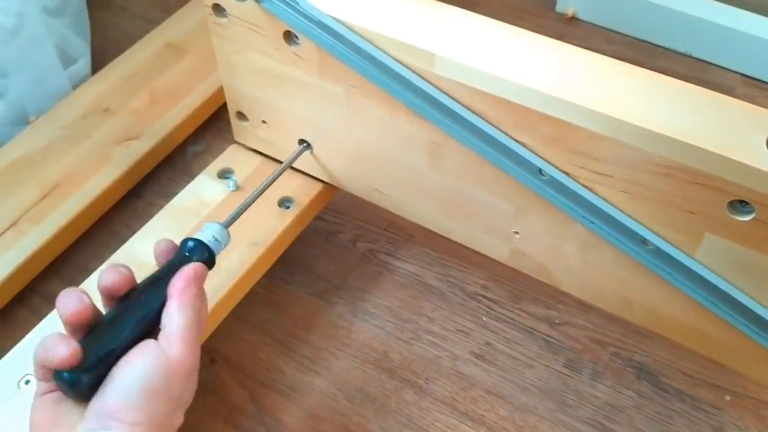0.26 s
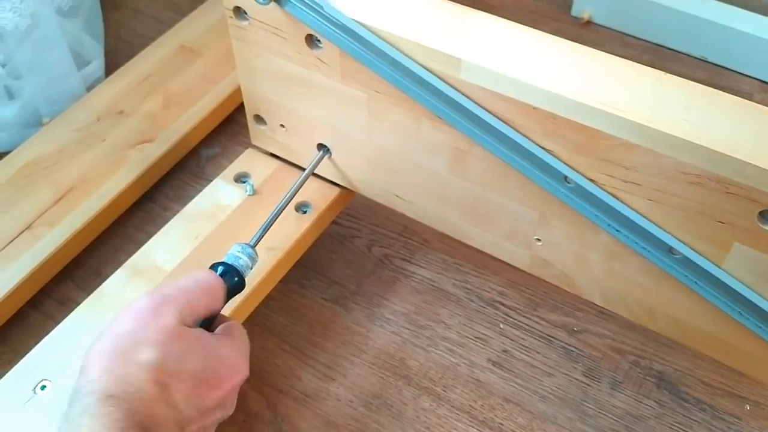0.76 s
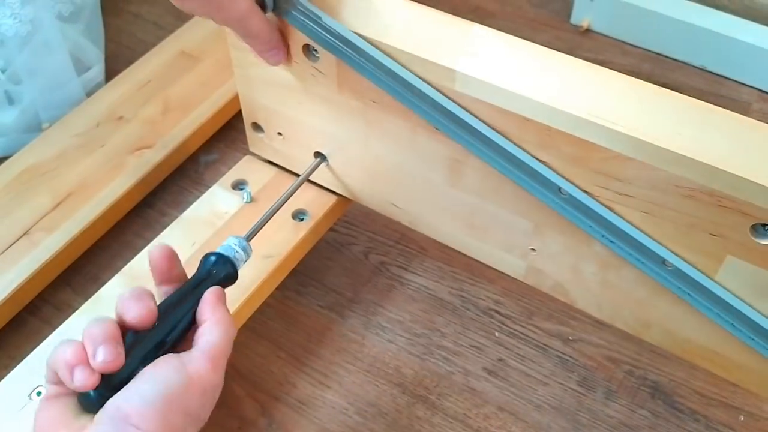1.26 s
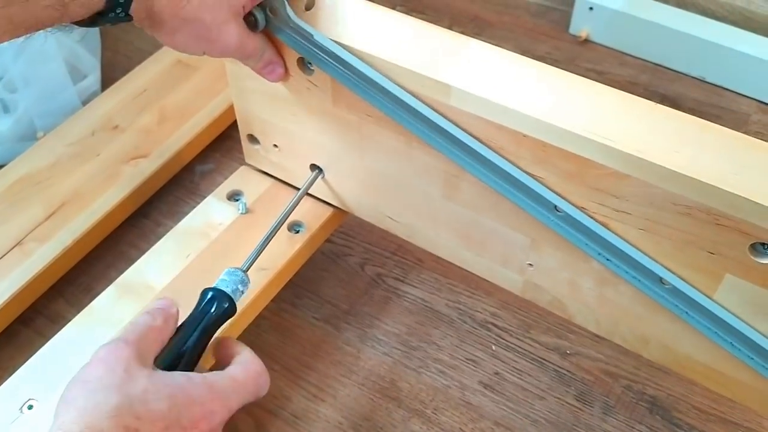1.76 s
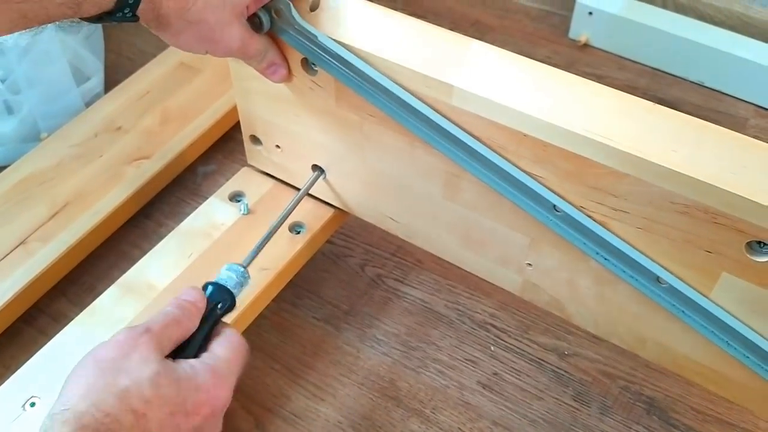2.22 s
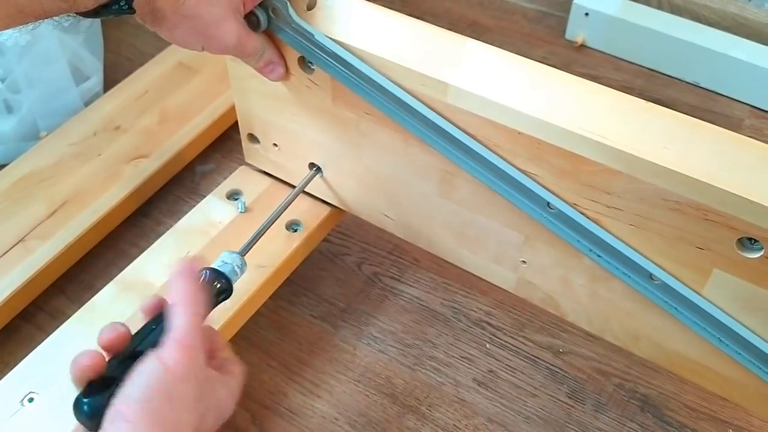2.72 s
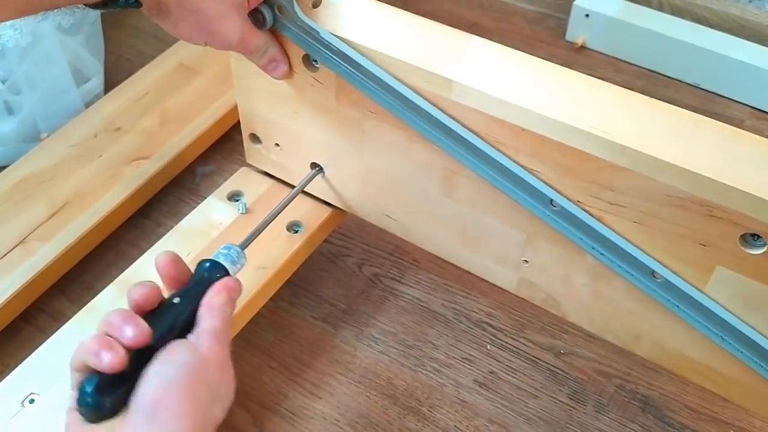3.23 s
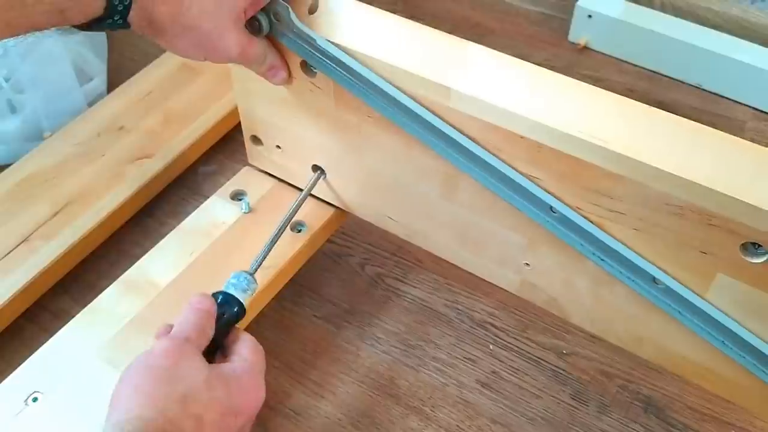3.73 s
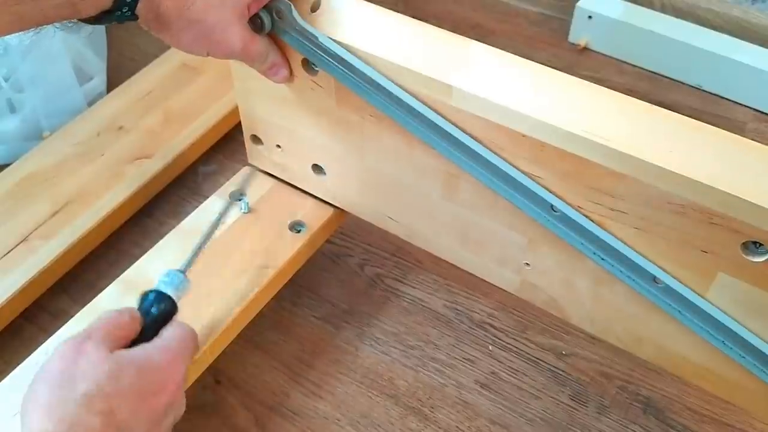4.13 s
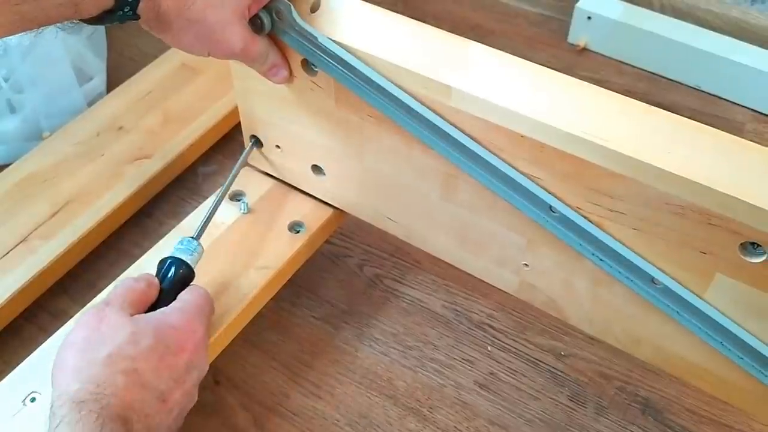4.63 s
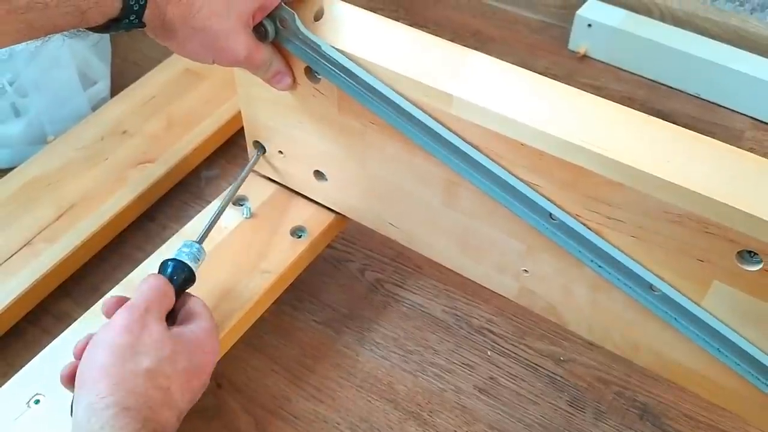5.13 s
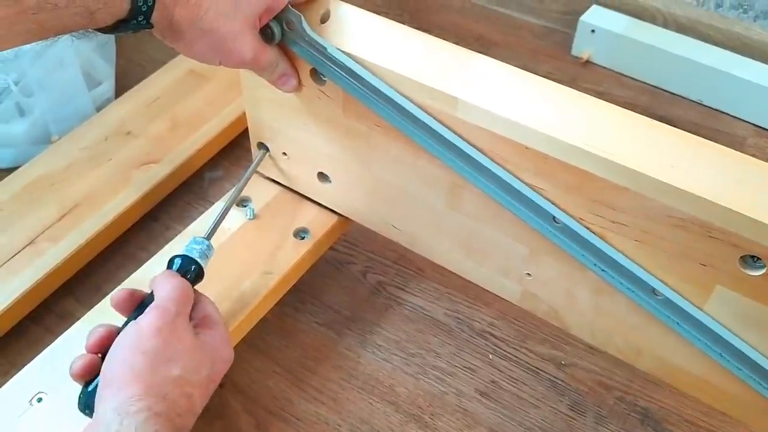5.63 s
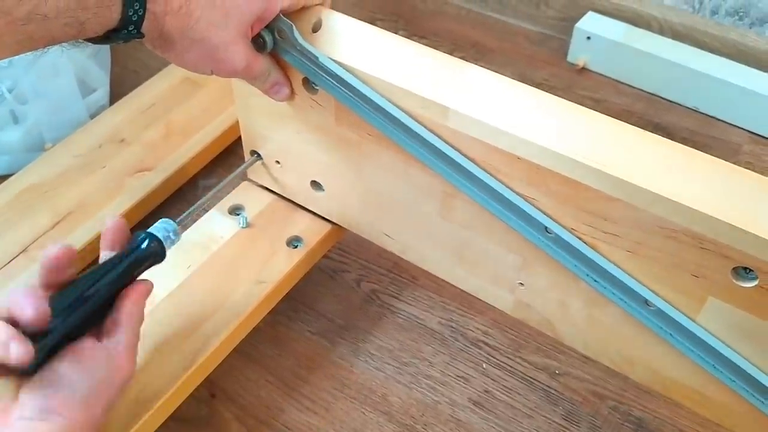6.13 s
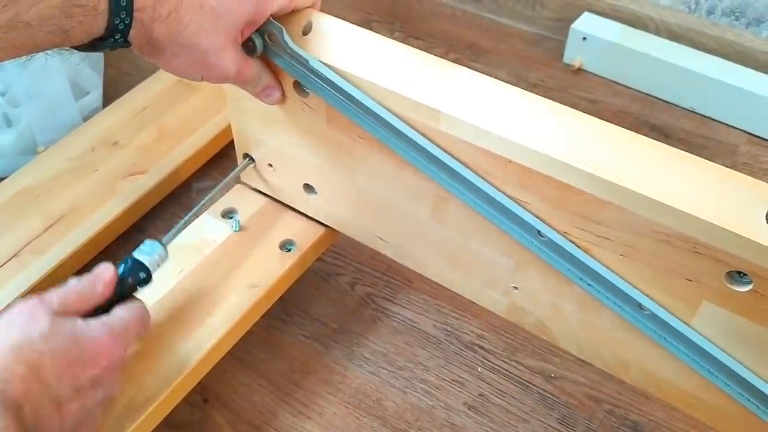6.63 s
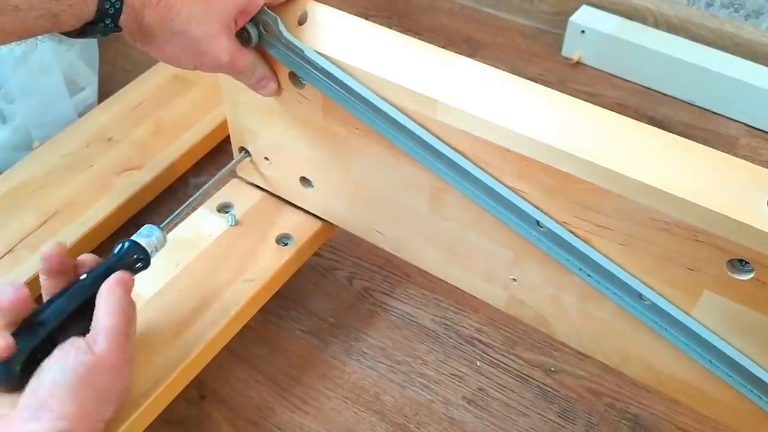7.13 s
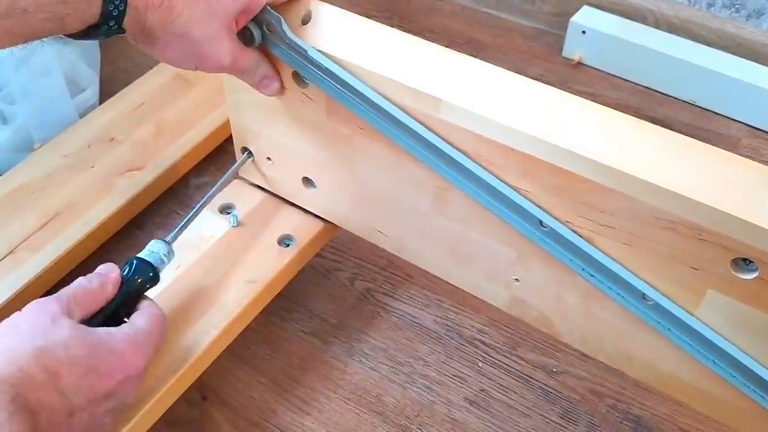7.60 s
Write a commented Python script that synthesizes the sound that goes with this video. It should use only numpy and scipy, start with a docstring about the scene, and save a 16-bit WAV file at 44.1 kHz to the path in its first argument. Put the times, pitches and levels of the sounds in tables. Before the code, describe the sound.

Close indoor assembly work: uneven short knocks on wooden boards with thin steel rings and crisp ticks, mixed with dry hand slides over handle and wood. The start is woody, the middle light and fiddly with a faint treble squeak. Near five seconds come the loudest, most metallic clacks and rattles; later taps grow sparse and dull, with a low frame bump near the end. Soft room air throughout.

```python
"""Screwdriver on a bed frame

A small room, a two-port microphone close to a wooden bed frame whose bolts are turned by screwdriver.
Each slip or knock is a burst of jagged force that rings boards, rail and shaft and leaves a bright tick.
Hands slide over handle and wood as grainy noise; dying sines make steel clinks and floor bumps.
Thin wavering sines squeak in the treble; a low noise rumble wavers beneath, in steady still air.
"""
import sys
import numpy as np
from scipy import signal
from scipy.fft import rfft, irfft, next_fast_len
from scipy.io import wavfile
from scipy.ndimage import uniform_filter1d

SR = 44100
rng = np.random.default_rng(int(sys.argv[2]) if len(sys.argv) > 2 else 0)


def put_to_file(sound):
    """Save the sound as 16-bit audio at rate SR, in the file named by the first command-line argument."""
    columns = np.atleast_2d(sound).T  # one column per channel
    safe = np.clip(columns, -1, 1)
    whole_steps = np.round(safe * 32767)
    wavfile.write(sys.argv[1], SR, whole_steps.astype(np.int16))


N = 346626

# Still air of the room: pitch_hz, relative density_db (per Hz)
AIR_SPECTRUM = [(60, -33.5), (100, -12.5), (200, 11.5), (500, 1.5), (700, -3.5), (2000, -7.5), (5000, -18),
                (9000, -8), (13000, -27.5), (16500, -42)]
# Low rumble: pitch_hz, relative density_db (per Hz)
RUMBLE_SPECTRUM = [(10, -16), (28, -10), (40, -11), (52, 0), (64, -16), (100, -19), (140, -26), (250, -50)]
# Wavering of the rumble: time_s, level_db
RUMBLE_LEVELS = [(0.0, -44), (0.46, -59.5), (0.59, -43), (1.14, -47.5), (1.42, -48), (1.52, -39.5),
                 (1.64, -48), (2.06, -52.5), (3.4, -48), (3.96, -39), (4.08, -52), (4.7, -54),
                 (5.28, -44.5), (5.82, -40.5), (6.6, -61.5), (6.92, -37), (7.15, -49), (7.53, -47),
                 (7.86, -40.5)]
# Knocks of the tip: peak_force_s, boards_db, shaft_db, tick_db, build_up_ms
KNOCK_EVENTS = [(0.005, -17, -22.5, -24, 3.15), (0.143, -25.5, -47.5, -27.5, 4.3),
                (0.155, -14.5, -21.5, -27.5, 3.2), (0.495, -34, -32.5, -64, 0.71),
                (0.528, -21, -32, -44, 2.1), (1.001, -23.5, -48, -50, 1.8), (1.115, -22, -45, -38, 1.2),
                (1.29, -38, -60, -56, 1.2), (1.5, -40, -63, -54, 1.6), (1.628, -29.5, -39, -51, 9.9),
                (1.722, -35.5, -46, -67, 4.2), (1.854, -25.5, -34.5, -33.5, 2.9),
                (1.884, -26, -39, -44, 12), (2.265, -29.5, -51, -45, 3.5), (2.389, -29, -34.5, -54, 2.5),
                (2.569, -36.5, -48, -45, 5.8), (2.694, -48.5, -57, -55, 2), (2.732, -30, -56, -46, 7),
                (2.865, -26, -66, -64, 1.4), (2.88, -32, -40, -44, 1.3), (3.036, -24.5, -42, -41, 4.6),
                (3.066, -27, -51, -33.5, 8), (3.198, -22.5, -39.5, -27, 0.91), (3.313, -27, -47, -38, 3.7),
                (3.331, -15, -29.5, -31, 4.4), (3.522, -33, -34.5, -49.5, 1.3),
                (3.693, -36.5, -31, -33, 2.7), (3.79, -22, -38.5, -36.5, 2.2),
                (3.869, -33, -44, -46.5, 0.88), (3.942, -35, -44.5, -54, 1.1),
                (4.036, -39.5, -53, -52, 4.6), (4.13, -49.5, -42, -35, 1.4),
                (4.162, -49, -31.5, -26.5, 2.7), (4.189, -39, -35.5, -40, 1.7), (4.215, -68, -58, -43, 1.5),
                (4.291, -84, -70, -46, 1), (4.511, -37.5, -41, -42, 2.2), (4.729, -12, -10, -30.5, 0.19),
                (4.897, -30.5, -28.5, -35, 3.1), (4.909, -26, -32, -35, 9.7),
                (4.925, -22.5, -5.5, -26, 0.52), (4.952, -32.5, -20.5, -21.5, 9.1),
                (4.978, -75, -55, -41, 1.2), (5.144, -23.5, -20, -19.5, 2.7), (5.152, -27, -16.5, -10, 1.2),
                (5.166, -27, -9, -7.5, 5.4), (5.376, -19.5, -27.5, -41, 7.2), (5.387, -35.5, -33, -45, 4.2),
                (5.427, -11, -34, -45, 14), (5.441, -30, -6, -13.5, 8.3), (5.577, -20.5, -19, -22.5, 6.1),
                (5.596, -26, -11.5, -2, 2.8), (5.754, -19, -33, -36.5, 4.9),
                (5.851, -21.5, -31.5, -35.5, 1.5), (5.948, -17, -23.5, -31, 2.3),
                (6.006, -36.5, -47, -42, 0.66), (6.067, -37, -59, -56, 1.7), (6.253, -43, -36, -37.5, 4.7),
                (6.317, -43.5, -76, -57, 2.4), (6.44, -47.5, -63, -55, 3), (6.504, -37.5, -43, -73, 3.9),
                (6.836, -31.5, -61, -48, 1.5), (7.02, -25.5, -45, -60, 5.1),
                (7.227, -26, -37.5, -49.5, 1.5), (7.414, -43, -43, -35, 3.4), (7.424, -37, -19.5, -25, 2.3),
                (7.444, -76, -23, -45, 6), (7.532, -15.5, -14.5, -19, 3.6), (7.697, -22.5, -21, -33, 0.8),
                (7.765, -37, -60, -41, .7), (7.845, -31.5, -33.5, -77, 2.9)]
# Work stages, as grip and tightness retune the boards and change what reaches the rail:
# start_s, rail_change_db, boards_pitch_factor (no unit)
WORK_STAGES = [(0, -3.5, 1.036), (1.8, -1, 1), (3.1, -3.5, 1.003), (4.6, 3.5, 1.063), (5.7, 1, 1.001),
               (7.3, -2.5, 0.92)]
# Modes of the boards before the stage's pitch factor: pitch_hz, relative level_db, t60_s
BOARD_MODES = [(183, -16, 0.4), (223.5, -12, 0.24), (266, -13, 0.36), (410.6, -3, 0.19), (388.4, -1, 0.11),
               (568.7, 3.5, 0.2), (652, 4.5, 0.025)]
# Modes of the rail: pitch_hz, relative level_db, t60_s
RAIL_MODES = [(740, -8.5, 0.27), (823, 3.5, 0.14), (908.4, -1, 0.12), (1063, 4.5, 0.1), (1120, -6.5, 0.27),
              (1188, -7.5, 0.018)]
# Modes of the screwdriver shaft: pitch_hz, relative level_db, t60_s
SHAFT_MODES = [(1498, -0.5, 0.18), (1548, 11.5, 0.057), (1826, 17.8, 0.038), (1905, 13, 0.065),
               (2022, 26.9, 0.013), (2327, 16, 0.025), (2490, 15, 0.025), (2830, 6, 0.03),
               (3507, 8.9, 0.024)]
# Bright tick of the tip: pitch_hz, relative density_db (per Hz)
TICK_SPECTRUM = [(1500, -18.5), (2500, 6.5), (3200, 3), (3900, 5.5), (5500, -0.5), (7600, 0.5), (9200, 3),
                 (10200, -1), (11500, -8.5), (14000, -33), (16500, -58)]
# Blunt part of a blow on wood: pitch_hz, relative density_db (per Hz)
THUD_SPECTRUM = [(100, -28.5), (200, -1), (310, -8), (400, 0), (480, -14.5), (620, 1.5), (1000, -5.5),
                 (2000, -17), (3500, -35.5)]
# Uneven radiation towards the two ports: boards_db, rail_db, shaft_db, tick_db, thud_db
PORT_SPREAD = (2.24, 4.5, 3.5, 0.5, 2.5)
# Likeness of left and right in noises and echoes: pitch_hz, likeness (0 to 1)
PORT_LIKENESS = [(30, .85), (250, .95), (700, .75), (2000, .3), (8000, .3)]
# Balance of the ports: pitch_hz, left_above_right_db
PORT_BALANCE = [(200, -1.2), (1400, -.5), (2800, -3.4), (5600, -2), (10000, 1.7), (14000, 3.5)]
# Dying away of the room: pitch_hz, t60_s
ROOM_DECAY = [(150, 0.64), (400, 0.078), (1040, 0.3), (2760, 0.26), (7280, 0.24), (14000, 0.052)]
# Strength of the room: pitch_hz, tail_against_direct_db
ROOM_LEVEL = [(200, -8.5), (1000, -8), (3000, -9), (9000, -9)]
# Skin waking the resonances of wood and handle: pitch_hz, relative density_db (per Hz)
HISS_SPECTRUM = [(300, -16), (600, 2.5), (850, -4.5), (1100, -1.5), (1550, -7.5), (2150, -2), (2600, -10.5),
                 (3200, -11), (5020, -12.5), (10500, -6), (14500, -44.5), (16500, -60.5)]
# Strokes of skin over handle and wood: fastest_moment_s, level_db, length_s,
# brightness_db (added to the treble, taken from the hiss below)
HAND_STROKES = [(0.347, -45.5, 0.19, 3), (0.63, -51, 0.47, -3.5), (0.911, -40, 0.099, 1.5),
                (1.025, -54.5, 0.52, -7.5), (1.14, -51, 0.59, 4), (1.343, -50, 0.16, -8.5),
                (1.568, -49.5, 0.078, -5), (1.417, -33, 0.1, 4), (1.634, -43.5, 0.23, -1.5),
                (2.217, -52.5, 1, -1), (2.394, -53.5, 0.05, -14), (2.716, -46.5, 0.02, 0),
                (2.9, -50.5, 0.57, 1.5), (3.314, -47.5, 0.22, -2), (3.81, -64.5, 0.15, -18),
                (4.301, -58.5, 0.039, 18), (4.6, -61, 1, -11.5), (5.743, -52, 1, -2),
                (6.678, -50, 0.26, -9), (7.26, -58, 0.071, -13), (7.743, -51, 0.66, -7.3)]
# Tiny clinks of steel on steel: start_s, relative level_db, pitch_hz, t60_s
CLINK_EVENTS = [(0.9415, -18.5, 8970, 0.0069), (0.9662, -32, 9140, 0.024), (0.9774, -37, 9100, 0.026),
                (0.9858, -31.5, 9000, 0.026), (1.0695, -41, 8960, 0.019), (2.982, -46, 2070, 0.04),
                (3.061, -33.5, 2000, 0.069), (3.197, -27, 2017, 0.03), (3.322, -29, 2130, 0.037)]
# Bumps of the frame on the floor: start_s, level_db (each tone), reference pitch_hz, t60_s
BUMP_EVENTS = [(1.43, -39, 175, 0.18), (2.417, -41.5, 167, 0.16), (2.879, -41.5, 162.7, 0.62),
               (7.534, -28.5, 172, 0.2), (7.699, -42.5, 208, 0.13)]
# Thin treble squeaks, one strand a row, each a list of: time_s, pitch_hz
SQUEAK_STRANDS = [
    [(2.15, 8800), (2.245, 9300), (2.33, 8850), (2.38, 9150), (2.41, 8900)],
    [(2.2, 12800), (2.25, 12000)],
    [(2.28, 13200), (2.32, 12500), (2.35, 11450)],
    [(2.32, 9800), (2.41, 10800), (2.44, 10600), (2.47, 8900), (2.49, 9000), (2.52, 10000), (2.59, 10400),
     (2.63, 12100), (2.66, 11900), (2.72, 9100), (2.78, 10500), (2.84, 11000), (2.865, 9200)],
]

AIR_DB, SQUEAK_DB = -53.5, -60
THUD_DB, THUD_T60_S = -9.5, 0.13  # level against the boards
RAIL_FROM_SHAFT = 0.61  # place of the rail's level on the way from boards (0) to shaft (1)
STEEL_LOW_HZ = 514  # low cut of rail and shaft, which keeps their rings thin and free of boom
CHATTER_MS, CHATTER_PER_RISE = 2.74, 0.12  # contact lasts a little longer after a slow build-up
RATTLE_DB, RATTLE_MS = -21.5, 34  # loose parts shake on after each blow
# The left lags slightly; each part of a blow gets its own small random lag.
LEFT_LAG_MS, LAG_SPREAD_MS = 0.12, 0.1
STROKE_FALL_DB = 33.5  # level lost one length away from the fastest moment
BRIGHT_HZ = 7700  # the treble of the hiss starts here
GRIT_DB = 1.5  # unevenness of the lower hiss
EDGE_HZ = 16000  # upper band limit


def gain_of(db):
    """Decibels to an amplitude factor."""
    return 10 ** (np.asarray(db) / 20)


def evened(x):
    """Scales to rms 1."""
    return x / np.sqrt(np.mean(x ** 2) + 1e-20)


def wander(length, size):
    """Smoothed random curve of rms 1; a larger size in samples drifts more slowly."""
    return evened(uniform_filter1d(rng.standard_normal(length), size=size))


def read(points, hz):
    """Reads a table of values over pitch on a log-frequency axis."""
    f, value = np.transpose(points)
    return np.interp(np.log(hz + 1), np.log(f + 1), value)


def filtered(x, order, hz, kind):
    """Butterworth filter; kind is "high" or "low" for the band that passes."""
    return signal.sosfilt(signal.butter(order, hz, kind, fs=SR, output="sos"), x)


def add(mix, s, sound):
    """Mixes a sound in at time s; what lies before zero is dropped."""
    at = round(s * SR)
    sound = sound[max(-at, 0):]
    part = mix[max(at, 0):][:len(sound)]
    part += sound[:len(part)]


def unlike(a, b, likeness):
    """Mixes two independent signals into one with the given likeness to the first."""
    return likeness * a + np.sqrt(1 - likeness ** 2) * b


def noise(points, patchy_db, size=512):
    """Two-port noise of the given spectrum whose level drifts in patches of time and pitch, rms 1."""
    frames, hz = N // (size // 4) + 5, np.fft.rfftfreq(size, 1 / SR)
    a, b, c, d, patches = rng.standard_normal((frames, size // 2 + 1, 5)).T
    patches = uniform_filter1d(patches, size=8, axis=0)
    patches = evened(uniform_filter1d(patches, size=12, axis=1))
    left = a + 1j * b
    right = unlike(left, c + 1j * d, read(PORT_LIKENESS, hz)[:, None])
    level_db = read(points, hz)[:, None] + patchy_db * patches
    balance_db = np.outer([.5, -.5], read(PORT_BALANCE, hz))[..., None]
    spectrum = np.array([left, right]) * gain_of(level_db + balance_db)
    return evened(signal.istft(spectrum, nperseg=size, noverlap=size * 3 // 4)[1][:, :N])


def air():
    """Still air of the room: a soft, steady noise, strongest in the low middle."""
    return gain_of(AIR_DB) * noise(AIR_SPECTRUM, patchy_db=2, size=1024)


def rumble():
    """Low noise whose level wavers along a drawn curve."""
    level_db = np.interp(np.arange(N) / SR, *np.transpose(RUMBLE_LEVELS))
    return gain_of(level_db) * noise(RUMBLE_SPECTRUM, patchy_db=4.0, size=4096)


def ring(modes, spread, damped, near_db):
    """One dying sine a row: each mode is a close trio, flanked by well damped neighbours that thicken it."""
    t = np.arange(SR // 3) / SR
    trio = [(hz * (1 + spread * way / 4), db, t60) for hz, db, t60 in modes for way in (-1, 0, 1)]
    near = [(hz * (1 + spread * way), db + near_db, t60 * damped)
            for hz, db, t60 in modes for way in (-1, 1)]
    return np.array([gain_of(db - 60 * t / t60) * np.sin(2 * np.pi * hz * t) for hz, db, t60 in trio + near])


def colour(points, size=512):
    """Causal (minimum-phase) impulse with the given spectrum."""
    level_db = read(points, abs(np.fft.fftfreq(size, 1 / SR)))
    log_gain = np.log(gain_of(np.maximum(level_db, -100)))
    return np.fft.ifft(np.exp(np.conj(signal.hilbert(log_gain)))).real[:size // 2]


def thud():
    """Countless small modes of the frame blur the blunt blow into a short rough tail."""
    t = np.arange(SR // 8) / SR
    tails = gain_of(-60 * t / THUD_T60_S) * rng.standard_normal((6, len(t)))
    return signal.fftconvolve(colour(THUD_SPECTRUM, size=2048)[None], tails, axes=1)


def strike(part, envelope, spread_db):
    """Drives one part with rough force; every blow wakes its modes in new strengths, signs and balance."""
    count = len(part)
    weights = gain_of(1.46 * rng.standard_normal(count)) * rng.choice([-1, 1], count)
    tilt = gain_of(spread_db * np.outer([1, -1], rng.standard_normal(count)))
    force = envelope * rng.standard_normal(len(envelope))
    sound = signal.fftconvolve(force[None], (weights * tilt) @ part, axes=1)
    # loudest 4 ms come to rms 1
    return sound / np.sqrt(uniform_filter1d((sound ** 2).mean(0), size=180).max())


def knocks():
    """A jagged contact force swells, chatters out and rings each part at its own level."""
    boards = [ring(np.multiply(BOARD_MODES, (tune, 1, 1)).tolist(), 0.057, 0.61, near_db=-4.0)
              for _, _, tune in WORK_STAGES]
    rail = filtered(ring(RAIL_MODES, 0.065, 0.24, near_db=4.5), 2, STEEL_LOW_HZ, "high")
    shaft = filtered(ring(SHAFT_MODES, 0.051, 0.5, near_db=8.0), 2, STEEL_LOW_HZ, "high")
    tick, blunt = colour(TICK_SPECTRUM)[None], thud()
    ms = np.arange(-SR // 20, SR // 20) * 1000 / SR  # 50 ms either side of the peak force
    out = np.zeros((2, N))
    for s, boards_db, shaft_db, tick_db, rise_ms in KNOCK_EVENTS:
        stage = sum(row[0] <= s for row in WORK_STAGES) - 1
        rail_db = boards_db + RAIL_FROM_SHAFT * (shaft_db - boards_db) + WORK_STAGES[stage][1]
        parts = (boards[stage], rail, shaft, tick, blunt)
        levels_db = (boards_db, rail_db, shaft_db, tick_db, boards_db + THUD_DB)
        chatter_ms = CHATTER_MS + CHATTER_PER_RISE * rise_ms
        contact = np.exp(np.where(ms < 0, ms / rise_ms, -ms / chatter_ms))
        rattle = (ms > 0) * gain_of(RATTLE_DB) * np.exp(-abs(ms) / RATTLE_MS)
        jags = gain_of(2 * rng.exponential(1, len(ms)))  # uneven micro-impacts
        for part, db, spread_db in zip(parts, levels_db, PORT_SPREAD):
            left, right = gain_of(db) * strike(part, (contact + rattle) * jags, spread_db)
            lag_ms = LEFT_LAG_MS + LAG_SPREAD_MS * rng.standard_normal()
            add(out[0], s - 1 / 20 + lag_ms / 1000, left)
            add(out[1], s - 1 / 20, right)
    return filtered(out, 4, 150, "high")  # low cut keeps the knocks free of boom


def room(x):
    """Sparse random echoes follow the direct sound and die band by band; the ports are balanced."""
    taps, size = np.zeros((2, SR // 2)), next_fast_len(N + SR)
    # one echo in every 20 samples, from 200 samples on
    at = np.arange(200, SR // 2 - 20, 20) + rng.integers(0, 20, (2, (SR // 2 - 201) // 20))
    np.put_along_axis(taps, at, rng.choice([-1., 1.], at.shape), 1)
    hz, t, bands = signal.stft(taps, SR, nperseg=256)
    t60 = read(ROOM_DECAY, hz)[:, None]
    bands = bands * gain_of(-60 * t / t60) / np.sqrt(t60)  # equal energy in all bands
    tail = signal.istft(bands, SR, nperseg=256)[1]
    hz = np.fft.rfftfreq(size, 1 / SR)
    left, other = rfft(tail / np.linalg.norm(tail[0]), size)
    right = unlike(left, other, read(PORT_LIKENESS, hz))
    echoes = gain_of(read(ROOM_LEVEL, hz)) * np.array([left, right])
    ports = gain_of(np.outer([1, -1], read(PORT_BALANCE, hz) / 2))
    return irfft(rfft(x, size) * (1 + echoes) * ports, size)[:, :N]


def hands():
    """Skin catches and slips: grainy hiss in strokes that swell and fade, brighter or duller by stroke."""
    t = np.arange(N) / SR
    grain = evened(gain_of(0.57 * wander(N, 120)))
    hiss = grain * noise(HISS_SPECTRUM, patchy_db=2)
    treble = filtered(hiss, 2, BRIGHT_HZ, "high")
    body = filtered(hiss, 2, BRIGHT_HZ, "low")
    body = body * evened(gain_of(GRIT_DB * wander(N, 300)))
    slow = t[::64]  # strokes change slowly, so a coarse time axis is enough
    body_power, treble_power = np.zeros((2, len(slow)))
    for s, db, length, bright_db in HAND_STROKES:
        stroke_db = db - STROKE_FALL_DB * (abs(slow - s) / length) ** 1.445
        body_power += gain_of(stroke_db - bright_db) ** 2
        treble_power += gain_of(stroke_db + bright_db) ** 2
    body_level = np.interp(t, slow, np.sqrt(body_power))
    treble_level = np.interp(t, slow, np.sqrt(treble_power))
    return body_level * body - treble_level * treble  # the minus keeps the bands in phase where they meet


def clinks():
    """Steel on steel: short rings of one dying sine each, with a soft onset."""
    out, t = np.zeros(N), np.arange(SR // 10) / SR
    for s, db, hz, t60 in CLINK_EVENTS:
        level = 1.7 * gain_of(db - 60 * t / t60) * (1 - np.exp(-t / 0.00031))
        add(out, s, level * np.sin(2 * np.pi * hz * t))
    return out


def bumps():
    """The frame bumps the floor: low, soft-edged thumps of four tones around the reference pitch."""
    out, t = np.zeros(N), np.arange(SR // 2) / SR
    for s, db, hz, t60 in BUMP_EVENTS:
        tones = sum(np.sin(2 * np.pi * (hz * ratio * t + rng.random())) for ratio in (.65, .85, 1.05, 1.3))
        add(out, s, gain_of(db - 60 * t / t60) * (1 - np.exp(-t / 0.0035)) * tones)
    return out


def squeak():
    """Faint sines glide along each strand, unsteady in pitch and flickering in level."""
    out = np.zeros(N)
    for strand in SQUEAK_STRANDS:
        s, hz = np.transpose(strand)
        t = np.arange(s[0], s[-1], 1 / SR)
        wobble, flicker = wander(len(t), 400), wander(len(t), 400)
        turns = np.cumsum(np.interp(t, s, hz) * (1 + .006 * wobble)) / SR
        edges = np.clip(np.minimum(t - s[0], s[-1] - t) / .02, 0, 1)  # 20 ms fades
        add(out, s[0], edges * gain_of(SQUEAK_DB + 3.5 * flicker) * np.sin(2 * np.pi * turns))
    return out


def scene():
    """Knocks, clinks and squeaks sound in the room; air, rumble, hands and bumps are added without echoes."""
    in_room = room(knocks() + clinks() + squeak())
    return air() + rumble() + in_room + hands() + bumps()


def record(dry):
    """Flattens what exceeds full scale, then limits the band."""
    flat = np.clip(dry, -1, 1)
    low_pass = signal.firwin(511, EDGE_HZ, window=("kaiser", 9), fs=SR)
    return signal.oaconvolve(flat, low_pass[None], "same")


dry = scene()
out = record(dry)
put_to_file(out)
```